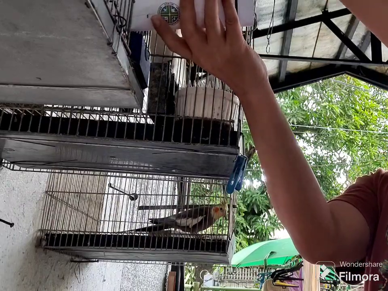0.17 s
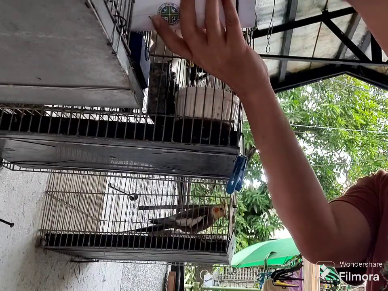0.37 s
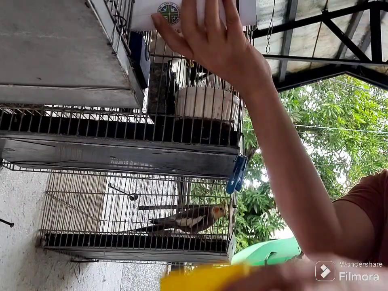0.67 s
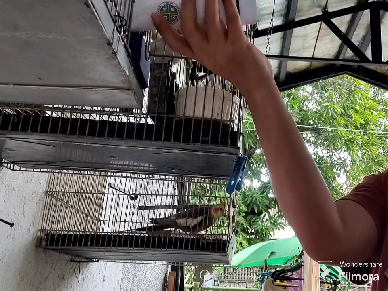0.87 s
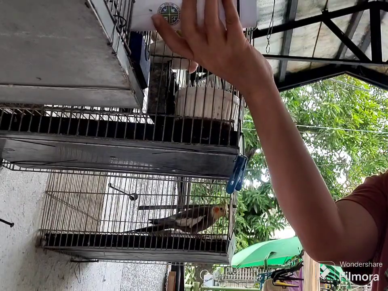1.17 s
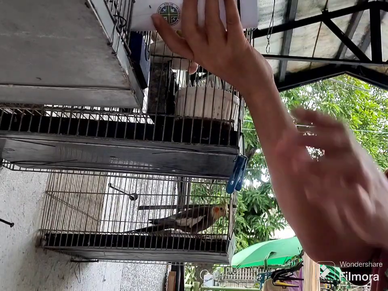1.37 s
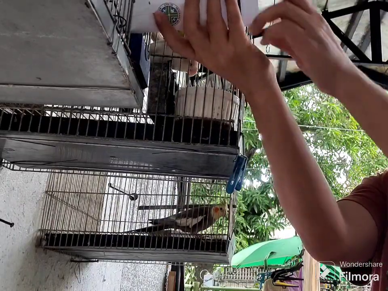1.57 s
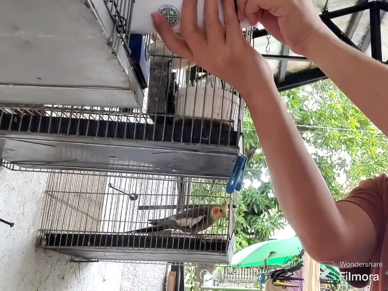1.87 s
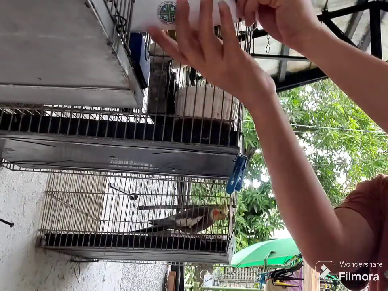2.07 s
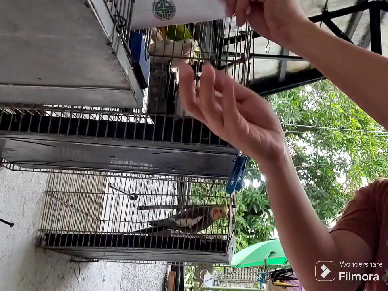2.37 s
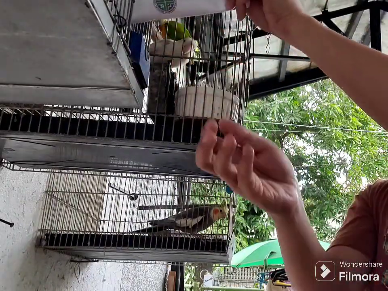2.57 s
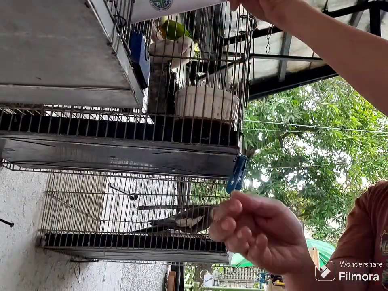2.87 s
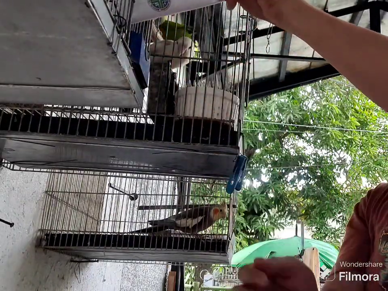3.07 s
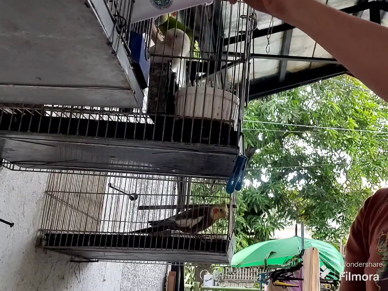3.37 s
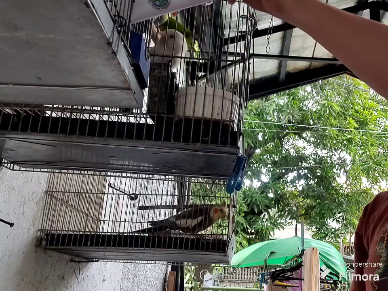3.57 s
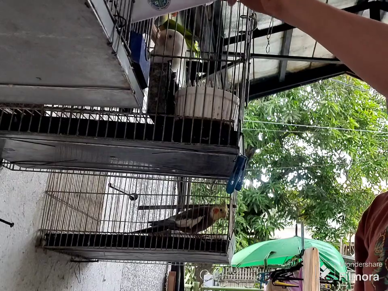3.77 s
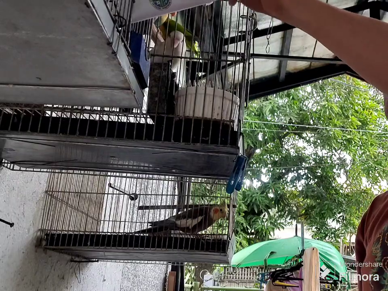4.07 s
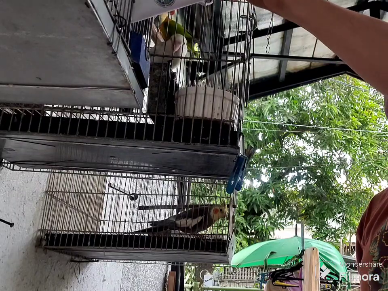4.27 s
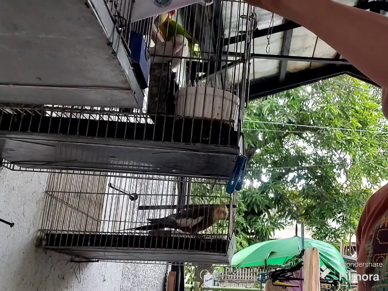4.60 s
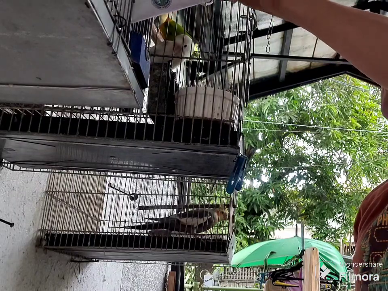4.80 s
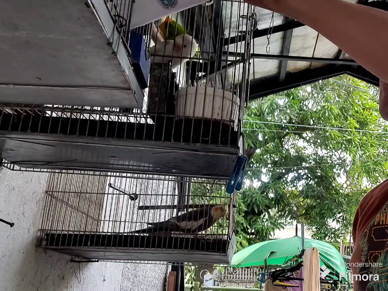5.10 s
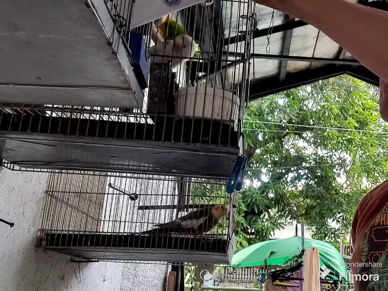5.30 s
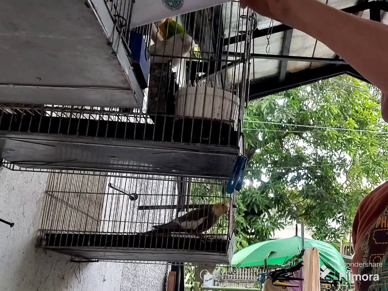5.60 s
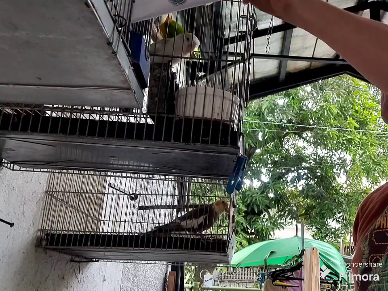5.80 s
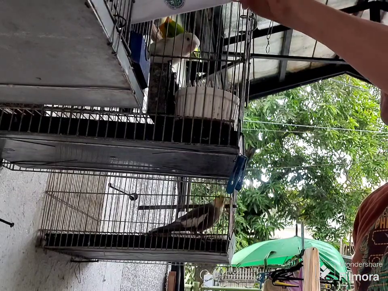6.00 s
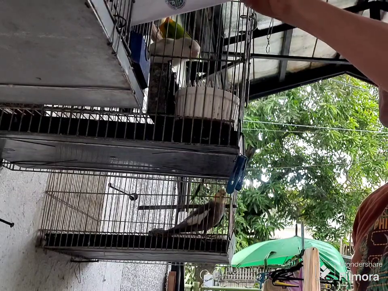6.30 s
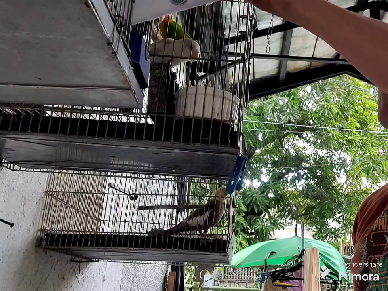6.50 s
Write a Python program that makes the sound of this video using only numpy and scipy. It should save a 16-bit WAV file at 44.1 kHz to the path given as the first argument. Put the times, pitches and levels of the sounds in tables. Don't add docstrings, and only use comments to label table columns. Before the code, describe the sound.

A louder half second of yard rumble, machine hum and blurred far birds cuts abruptly to a quieter porch. Fingernails flick paper, a hollow plastic tub lands with a loud pop, and cage bars knock. Paper shifts, then seeds rush down a paper chute in fast shaken bursts until the end, with a hard knock late and one short parrot squeak. Close phone microphone, faint outdoor hiss.

```python
import sys
import numpy as np
from scipy import signal
from scipy.fft import rfft, irfft, next_fast_len
from scipy.io import wavfile
from scipy.ndimage import uniform_filter1d

SR = 44100
rng = np.random.default_rng(int(sys.argv[2]) if len(sys.argv) > 2 else 0)


def pcm_store(signal):
    levels = np.round(np.clip(np.atleast_2d(signal), -1, 1) * 32767)
    wavfile.write(sys.argv[1], SR, levels.astype(np.int16).T)


def voltage_ratio(decibels):
    exponent = np.asarray(decibels, float) / 20
    return 10 ** exponent


N = 293265
T = np.arange(N) / SR


def level(x, db):
    return x * voltage_ratio(db) / np.sqrt(np.mean(x ** 2))


def colour(x, spectrum):
    hz, db = np.transpose(spectrum)
    size = next_fast_len(len(x))
    f = np.maximum(np.arange(size // 2 + 1) * SR / size, 1)
    gain = voltage_ratio(np.interp(np.log(f), np.log(hz), db))
    return irfft(rfft(x, size) * gain, size)[:len(x)]


def band(x, hz, width_hz):
    return signal.lfilter(*signal.iirpeak(min(hz, .45 * SR), hz / width_hz, SR), x)


def lowpass(x, hz):
    return signal.sosfiltfilt(signal.butter(2, hz, fs=SR, output="sos"), x)


def swell(t, rise, t60):
    t = np.maximum(t, 0)
    attack = np.sin(np.pi / 2 * np.minimum(t / rise, 1)) ** 2
    return attack * voltage_ratio(-60 * np.maximum(t - rise, 0) / t60)


def walk(rate):
    k = int(SR / rate)
    steps = np.repeat(rng.standard_normal(N // k + 1), k)
    return 1.36 * uniform_filter1d(uniform_filter1d(steps, k), k)[:N]


def grains(per_s, scatter_db):
    hit = rng.random(N) < per_s / SR
    sign = rng.standard_normal(N)
    size = np.minimum(rng.exponential(size=N), 3.5)
    return level(hit * sign * voltage_ratio(scatter_db * size), 0)


def add(out, s, sound):
    start = int(s * SR)
    out[start:start + len(sound)] += sound[:N - start]


def room(x, wet_db):
    t = T[:SR]
    sparse = rng.standard_normal(SR) * (rng.random(SR) < .1)
    near = sparse * swell(t - .002, 0.00085, t60=0.15)
    far = band(rng.standard_normal(SR), 1100, 2100) * swell(t - .02, 0.031, t60=0.56)
    echo = near / np.linalg.norm(near) + voltage_ratio(-48.5) * far / np.linalg.norm(far) * 10
    return x + voltage_ratio(wet_db) * signal.fftconvolve(x, echo)[:N]


def pop(t, hz, t60):
    return swell(t, 1.4 / hz, t60) * np.sin(2 * np.pi * hz * t - 3.0)


# frequency [Hz], density [dB per Hz].
SEED_ON_PAPER = [(150, -27), (400, 0.5), (800, -1.5), (1700, -1.5), (3000, -1.5), (4500, -4), (6000, -2),
                 (7800, -7), (8200, -9), (11000, -16.5), (15500, -18.5), (17000, -36.5)]
# frequency [Hz], width [Hz], level [dB].
CHUTE_MODES = [(1030, 63, -11), (1430.7, 62, -6.5), (1726, 65, -2), (2216, 109, -5), (2917, 530, -3),
               (4191, 260, -3), (5153, 220, -8), (6921, 80, -7.5), (7459, 450, -7.5)]
# time [s], level [dB], brightness [dB].
TRICKLE = [(1.05, -77, -7), (1.2, -68.5, 5), (1.75, -88, -10.5), (1.97, -69, 14), (2.72, -63, -11.5),
           (2.87, -53, 0), (3.31, -54, -1), (3.75, -49.5, -6.5), (4.36, -52.5, -0.5), (4.78, -47.5, -4.5),
           (5.07, -55, -11.5), (5.31, -42.5, -3), (5.67, -53, -10), (6.41, -52.5, -9.5), (6.56, -46.5, -1)]
# time [s], peak level [dB], brightness [dB], length [s].
SHAKES = [(2.694, -35.5, 5, 0.407), (2.836, -37, 0, 0.126), (3.237, -38, -9, 0.206),
          (3.3692, -30.5, -1.5, .22), (3.5195, -32, -0.5, 0.312), (3.6508, -32, -2, 0.364),
          (3.7968, -27.5, 0.5, 0.274), (3.8977, -33, 7, 0.107), (3.9445, -28.5, -5.5, 0.206),
          (4.0638, -38, 4.5, 0.076), (4.0935, -30.5, -5, 0.233), (4.238, -29, -7.5, 0.242),
          (4.3848, -33, -3.5, 0.317), (4.533, -31, -3, 0.293), (4.685, -28.5, -3.5, 0.149),
          (4.832, -27.5, -4.5, 0.433), (4.982, -30, -3.5, 0.39), (5.14, -29.5, -3.5, 0.57),
          (5.244, -38.5, -6, 0.176), (5.413, -41.5, -13, 0.34), (5.61, -35.5, -6.5, 0.2),
          (5.718, -32.5, -4, 0.25), (5.8535, -38.5, -3, 0.274), (5.923, -30, -0.5, 0.086),
          (5.981, -35.5, -10, 0.215), (6.2082, -35, -1, 0.153), (6.3484, -31.5, 0, 0.212),
          (6.3835, -32, -3, 0.088), (6.4492, -32, -12.5, 0.287), (6.602, -41, -17, .22)]
# time [s], peak level [dB].
RUSTLES = [
    (1.2493, -53.5),
    (1.3294, -51.5),
    (1.3987, -57),
    (1.736, -45),
    (1.9797, -61),
    (2.029, -44),
    (2.3894, -45),
]


def seeds():
    flow_s, flow_db, flow_bright_db = np.transpose(TRICKLE)
    body = voltage_ratio(np.interp(T, flow_s, flow_db, left=-100) + 1.2 * walk(60)) ** 2
    top = body * voltage_ratio(np.interp(T, flow_s, flow_bright_db)) ** 2

    handfuls = [(s, db, 4, 0.061, 0.2) for s, db in RUSTLES]
    for s, db, bright_db, length_s in SHAKES:
        handfuls.append((s, db, bright_db, 0.0175 + 0.077 * length_s, length_s))
    t = T[:SR // 3]
    for s, db, bright_db, rise_s, t60_s in handfuls:
        runs_out = np.exp(-(t / 0.21) ** 2)
        throw = (voltage_ratio(db - 11) * swell(t, max(rise_s, .002), t60_s) * runs_out) ** 2
        start_s = s - 0.614 * rise_s
        add(body, start_s, throw)
        add(top, start_s, throw * voltage_ratio(bright_db + 2.5) ** 2)

    rung = 0.5 * grains(per_s=12000, scatter_db=1.0) + 0.2455 * grains(per_s=500, scatter_db=1.0)
    for hz, width_hz, db in CHUTE_MODES:
        mode = band(grains(per_s=1200, scatter_db=1.0), hz, 1.166 * width_hz)
        rung += voltage_ratio(db + 7.5 + 1.2 * walk(60)) * mode
    rung = level(colour(rung, SEED_ON_PAPER), 0)
    low = lowpass(rung, 6000)
    return room(low * np.sqrt(body) + (rung - low) * np.sqrt(top), -10.5)


# frequency [Hz], level [dB].
TUB_WALLS = [(71, -51), (120, -21.5), (204, -11), (971, 0), (1100, -1), (1530, -4.5), (1630, -8.5),
             (2850, -19), (5000, -41), (6500, -77), (11000, -120)]
# frequency [Hz], t60 [s].
TUB_T60 = [
    (150, 0.316),
    (500, 0.23),
    (1000, 0.082),
    (2000, .11),
    (5000, 0.04),
]
# frequency [Hz], level [dB], t60 [s].
CAGE_WIRES = [
    (550.3, -50.5, 1.03),
    (1165.7, -50, 1.15),
    (420, -51.5, 1.6),
    (171.76, -51, 1.1),
]


def tub():
    start_s = .9477
    t = T[:SR]
    early = t[:SR // 4]
    hz = np.geomspace(130, 5000, num=90) * (1 + 0.0143 * rng.standard_normal(90))
    hz = hz[:, None]
    turn = 2 * np.pi * rng.random((90, 1))
    wall_hz, wall_db = np.transpose(TUB_WALLS)
    strength = voltage_ratio(np.interp(np.log(hz), np.log(wall_hz), wall_db)) * np.sqrt(hz / 1000)
    decay = swell(early - .0015, 0.0025, np.interp(hz, *np.transpose(TUB_T60)))
    walls = (strength * decay * np.sin(2 * np.pi * hz * early + turn)).sum(axis=0)
    hand_damps = np.clip((.09 - early) / 0.059, .1, 1)

    crack = rng.standard_normal(SR) * (swell(t, 0.00057, 0.016) + voltage_ratio(-14.5) * swell(t, 0.0075, 0.28))
    blow = voltage_ratio(-32.5) * crack
    blow[:len(early)] += voltage_ratio(-16.5) * walls * hand_damps
    out = np.zeros(N)
    add(out, start_s, voltage_ratio(-3.5) * blow + .98 * pop(t, 1580, .011))
    out = room(out, -10.5)
    for wire_hz, db, t60_s in CAGE_WIRES:
        wire = band(rng.standard_normal(SR), wire_hz, 25) * 30
        add(out, start_s, voltage_ratio(db) * wire * swell(t, 0.036, t60_s))
    return out


# time [s], peak level [dB], body pitch [Hz].
KNOCKS = [(1.504, -53.5, 590), (1.764, -28.5, 1324), (1.784, -29, 1178), (1.797, -41, 2090),
          (2.109, -36.5, 1625), (2.975, -39, 1200), (3.6, -41, 597), (3.748, -43.5, 700),
          (3.909, -33.5, 1030), (5.31, -26.5, 702), (5.318, -25.5, 3900), (5.3501, -23.5, 1920),
          (5.779, -45, 900), (6.332, -39, 1500), (6.603, -33.5, 1670)]
# time [s], peak level [dB], body pitch [Hz], t60 [s].
FLICKS = [(.566, -58, 4940, 0.175), (.608, -54.5, 6000, 0.132), (.657, -65.5, 12000, .08),
          (.685, -59.5, 8000, .08), (.7562, -32, 8100, 0.043), (0.759, -34, 4410, 0.058),
          (.77, -43.5, 7000, 0.16), (0.784, -48.5, 12000, 0.067), (3.6, -44, 6000, 0.051),
          (4.499, -53, 10000, 0.045), (5.3096, -30.5, 2800, 0.13), (5.3519, -35, 5500, 0.039)]
# time [s], level [dB], pitch [Hz].
POPS = [
    (1.7652, -22, 1400),
    (2.1083, -33, 1750),
    (5.3488, -27, 1000),
    (5.3512, -21, 2600),
]
# time [s], level [dB], pitch [Hz], t60 [s].
THUMPS = [
    (3.36, -48, 93, 0.25),
    (1.765, -51, 150, 0.15),
    (3.8, -55, 110, .3),
    (5.15, -53, 107, .2),
    (5.31, -50, 120, .2),
    (6.535, -52, 300, 0.1),
]


def knocks():
    out, t = np.zeros(N), T[:SR // 4]
    taps = [(*row, -4, -25.5) for row in FLICKS]
    for s, db, hz in KNOCKS:
        crack_db = 1.1 * (db + 28)
        taps.append((s, db, hz, 0.0812, crack_db, -10))
    for s, db, hz, t60_s, crack_db, thud_db in taps:
        rattle = rng.standard_normal(len(t)) * swell(t, 0.0013, t60_s)
        body = band(band(rattle, hz, 0.506 * hz), hz, min(3.8 * hz, .45 * SR))
        thud = band(band(rattle, 506, 690), 428, 1060)
        crack = colour(rattle * voltage_ratio(-900 * t), SEED_ON_PAPER)
        tap = body / abs(body).max() + voltage_ratio(crack_db) * crack + voltage_ratio(thud_db) * thud / abs(thud).max()
        add(out, s, voltage_ratio(db) * tap)
    for s, db, hz in POPS:
        add(out, s, voltage_ratio(db) * pop(t, hz, .011))
    for s, db, hz, t60_s in THUMPS:
        thump = band(band(rng.standard_normal(len(t)), hz, 0.73 * hz), hz, 0.73 * hz)
        add(out, s, level(thump, db) * swell(t, 0.0158, t60_s))
    return out


# time [s], pitch [Hz].
CHIRP_PITCH = [
    (6.5, 1830),
    (6.508, 1790),
    (6.516, 1755),
    (6.524, 1748),
    (6.529, 1705),
    (6.536, 1670),
    (6.546, 1580),
]
# level [dB], loudest moment [s], swell [s].
PARTIALS = [
    (-21, 6.524, 0.021),
    (-21, 6.533, 0.0115),
    (-24.5, 6.528, .018),
    (-20, 6.525, 0.0163),
    (-22.5, 6.52, 0.0111),
    (-48, 6.524, .012),
    (-39.5, 6.522, 0.02),
    (-40, 6.523, 0.0093),
    (-42.5, 6.528, 0.0107),
]
# frequency [Hz], density [dB per Hz].
BREATH = [
    (500, -14),
    (1500, -9),
    (4000, 0.5),
    (8000, -1),
    (10000, -13.5),
    (16000, -16.5),
]


def chirp():
    s, hz = np.transpose(CHIRP_PITCH)
    phase = 2 * np.pi * np.cumsum(np.interp(T, s, hz) * (1 + .005 * walk(500))) / SR
    voice = np.zeros(N)
    for k, (db, peak_s, swell_s) in enumerate(PARTIALS):
        spread_s = np.where(T < peak_s, swell_s, 0.833 * swell_s)
        shape = np.exp(-((T - peak_s) / spread_s) ** 2)
        voice += voltage_ratio(db + 2) * shape * np.sin((k + 1) * phase + 1.8 * k)
    voice *= np.clip((T - 6.501) / 0.0054, 0, 1)
    wall_echo = voltage_ratio(-10.5) * np.roll(voice, int(.016 * SR))
    breath = level(colour(rng.standard_normal(N), BREATH), -32) * np.exp(-((T - 6.533) / 0.03185) ** 4)
    return room(voice + wall_echo + breath, -7.5)


# frequency [Hz], density [dB per Hz].
PORCH_HISS = [
    (12, -57.5),
    (25, -46),
    (85, -6),
    (300, -7),
    (550, -10),
    (1200, -10),
    (2000, -17.5),
    (6000, -30),
    (12000, -39),
    (16000, -50.5),
]


def porch():
    coo_hz = 364.6 * (1 + 0.0301 * walk(40))
    coo = voltage_ratio(-57.5 + 4.0 * walk(30)) * np.sin(2 * np.pi * np.cumsum(coo_hz) / SR)
    coo *= np.clip((T - 5.85) / 0.106, 0, 1) ** 2
    hiss = level(colour(rng.standard_normal(N), PORCH_HISS), -59.5) * voltage_ratio(0.67 * walk(3.08))
    low = lowpass(hiss, 600)
    s, flow_db, _ = np.transpose(TRICKLE)
    mean_flow_db = -50.5
    rumble_db = -58 + 0.2463 * np.maximum(np.interp(T, s, flow_db) - mean_flow_db, -12)
    return hiss - low + level(low, 0) * voltage_ratio(rumble_db) + coo


# frequency [Hz], density [dB per Hz].
YARD_NOISE = [(12, -28), (20, 3.5), (158, -10), (216, -16), (642, -21.5), (780, -21), (1060, -22.5),
              (1150, -20.5), (4060, -31), (5230, -42), (6540, -33), (8180, -51), (16000, -35)]
# frequency [Hz], rms level [dB].
MACHINE_HUM = [
    (398.4, -63),
    (479.1, -60),
    (532.9, -55),
    (656.8, -56),
    (1066, -53),
]
# time [s], pitch [Hz], spread [Hz], level [dB].
FAR_BIRDS = [(0.0208, 5840, 580, -41), (0.044, 6370, 250, -39.5), (0.0665, 4530, 310, -42.5),
             (0.0158, 8600, 570, -50), (0.02, 11250, 800, -50), (0.0316, 15670, 1950, -36.5),
             (0.1776, 8040, 400, -48.5), (0.1924, 6370, 790, -43), (0.202, 3970, 126, -40.5),
             (.04, 5060, 340, -55), (0.083, 9300, 520, -52.5), (0.195, 5500, 380, -49.5),
             (0.209, 4520, 450, -47), (0.198, 11600, 1500, -51.5), (0.197, 14960, 1500, -42.5)]


def opening():
    out = level(colour(rng.standard_normal(N), YARD_NOISE), -37)
    for hz, db in MACHINE_HUM:
        out += voltage_ratio(db + 3.5 + 1.66 * walk(13.76)) * np.sin(2 * np.pi * hz * T + 0.75 * walk(12.2))
    t = T[T < .5265]
    for s, hz, spread_hz, db in FAR_BIRDS:
        t60_s = 0.712 if s < .15 else 0.404
        smear = band(band(rng.standard_normal(len(t)), hz, spread_hz), hz, 4.5 * spread_hz)
        out[:len(t)] += level(smear, db) * swell(t - s, 0.0221, t60_s)
    return out


def scene():
    first = np.clip((.5165 - T) / 0.0023, 0, 1)
    background = first * opening() + (1 - first) * porch()
    return (background + seeds() + knocks() + tub() + chirp())[None]


def roll_off(x):
    return signal.sosfilt(signal.butter(12, 16800, fs=SR, output="sos"), x)


def record(dry):
    clipped = np.clip(dry, -.99, .99)
    mix = signal.sosfilt(signal.ellip(10, .2, 60, 15850, fs=SR, output="sos"), clipped)
    return roll_off(mix)


dry = scene()
out = record(dry)
pcm_store(out)
```